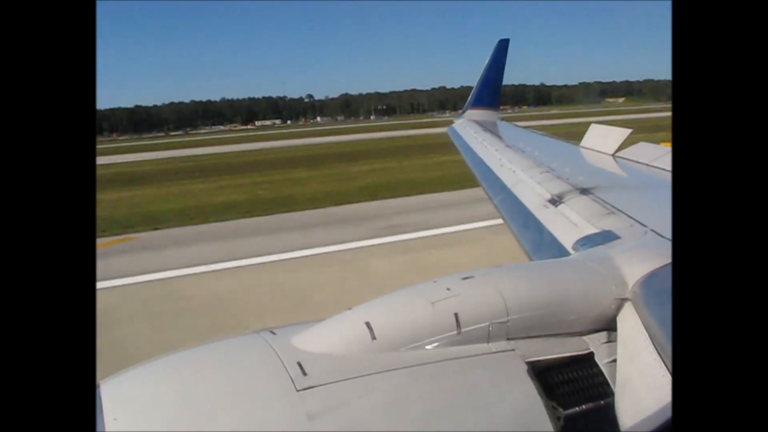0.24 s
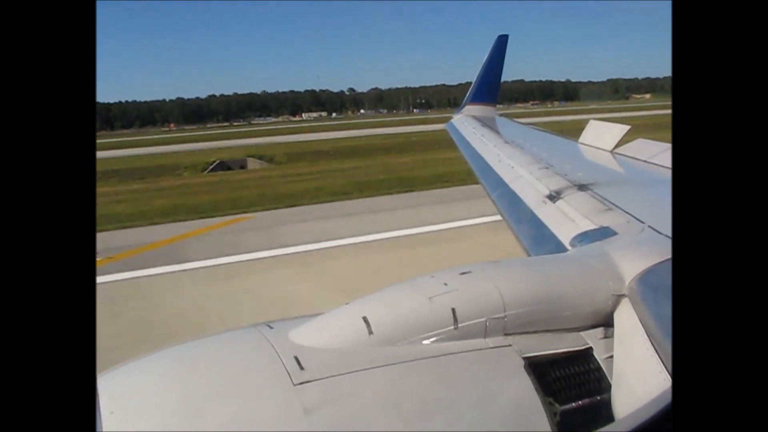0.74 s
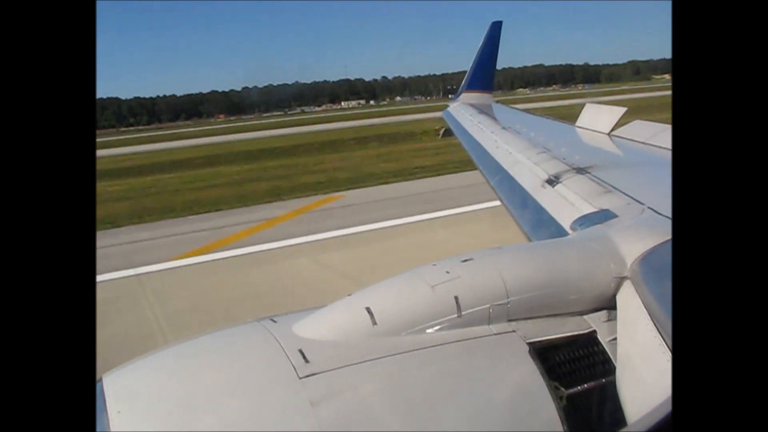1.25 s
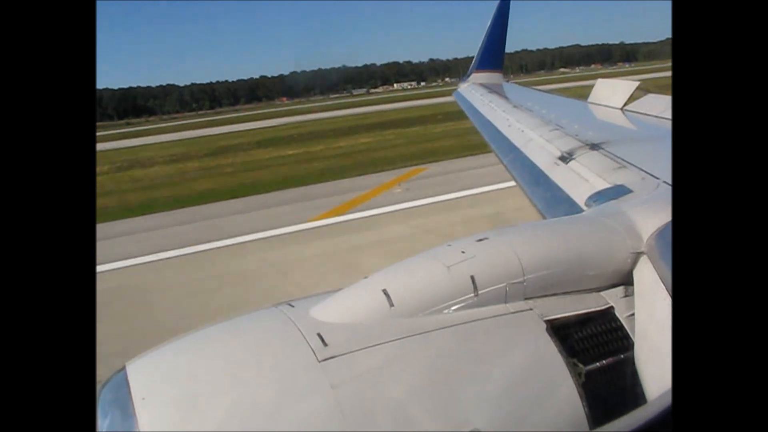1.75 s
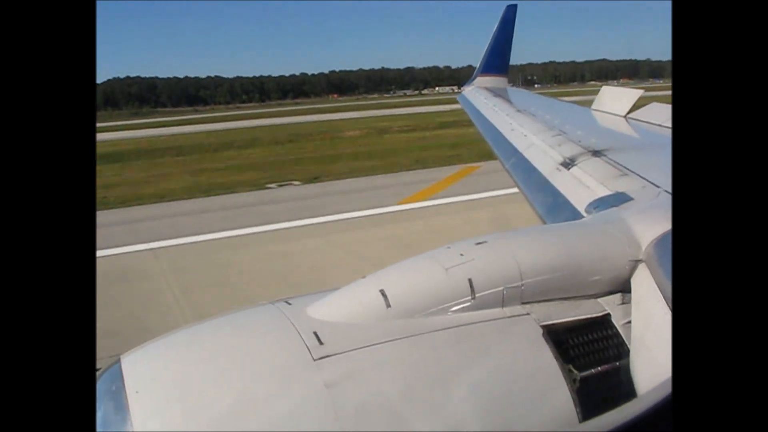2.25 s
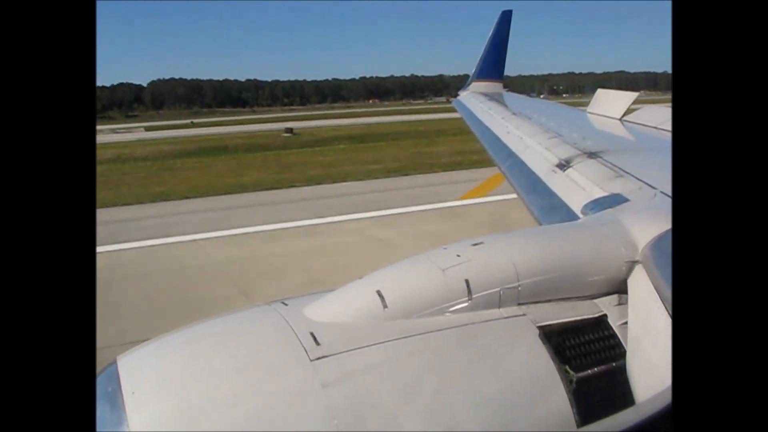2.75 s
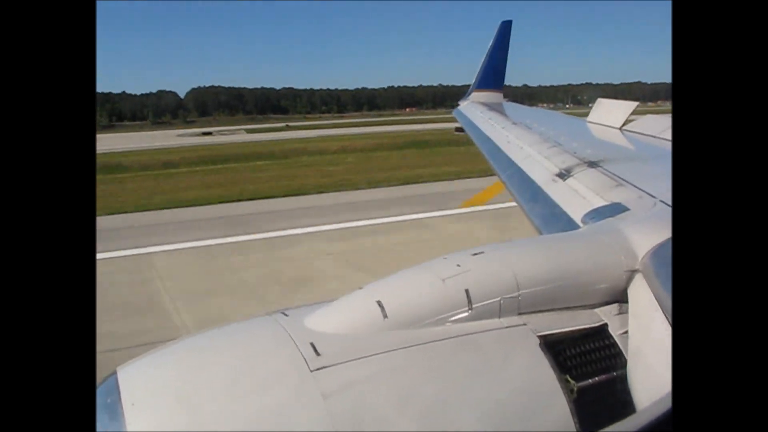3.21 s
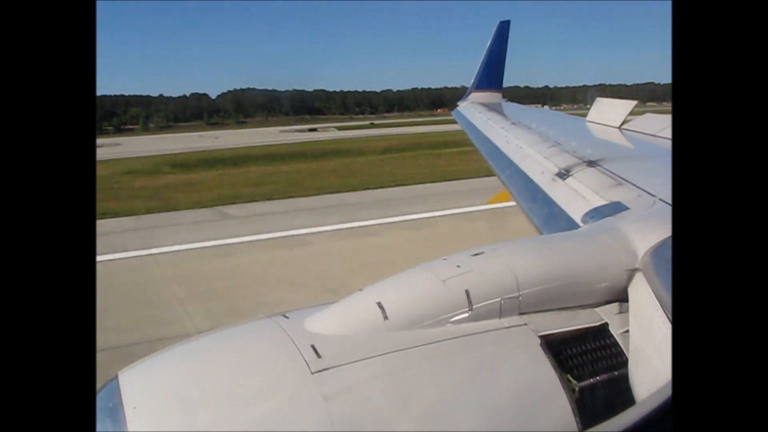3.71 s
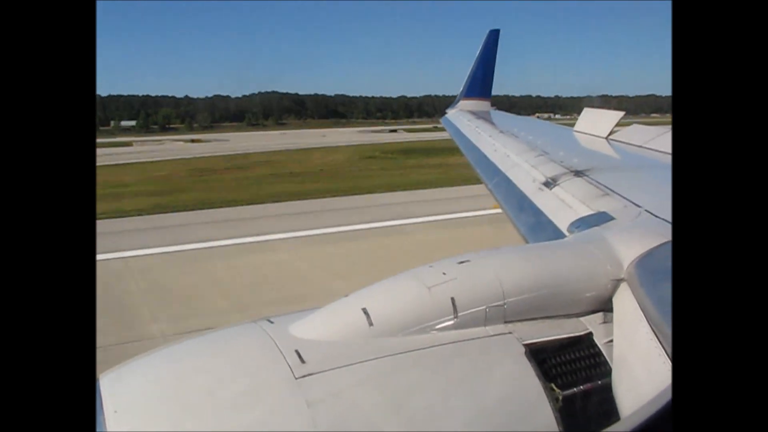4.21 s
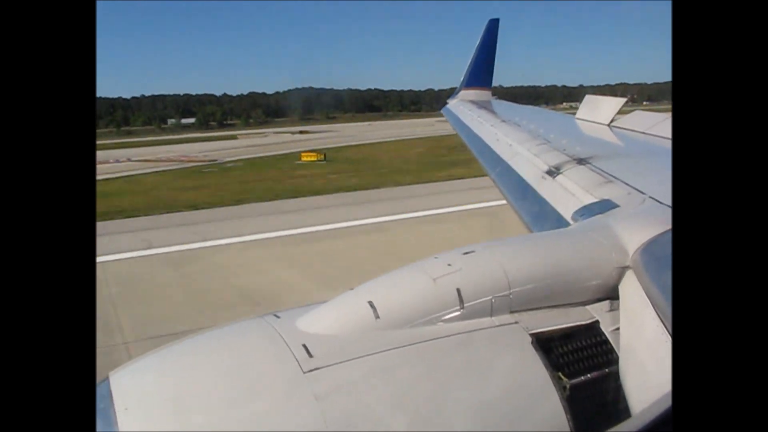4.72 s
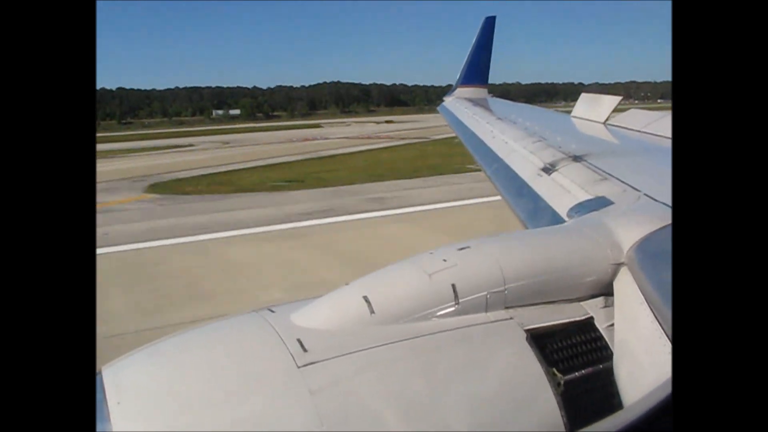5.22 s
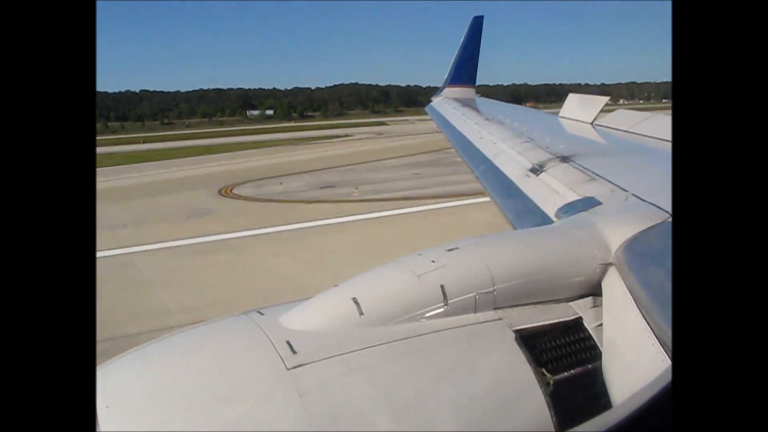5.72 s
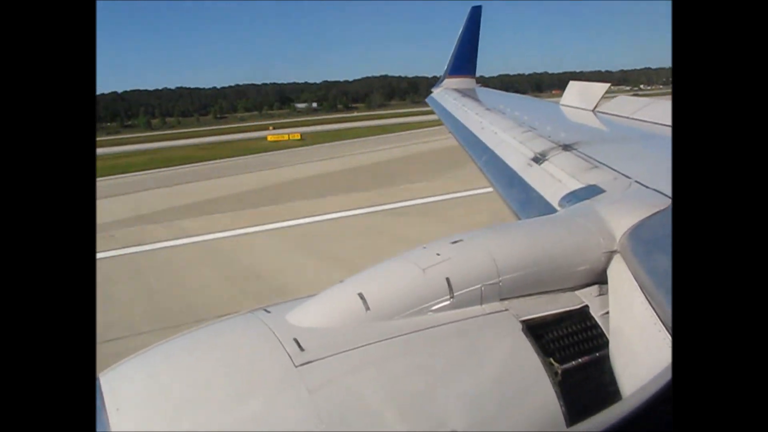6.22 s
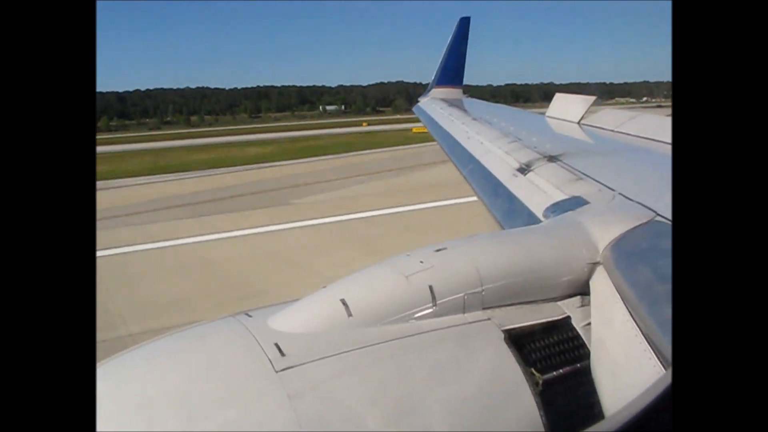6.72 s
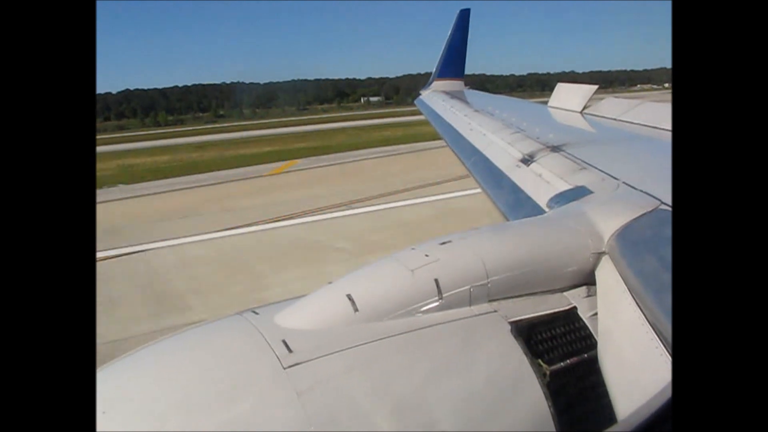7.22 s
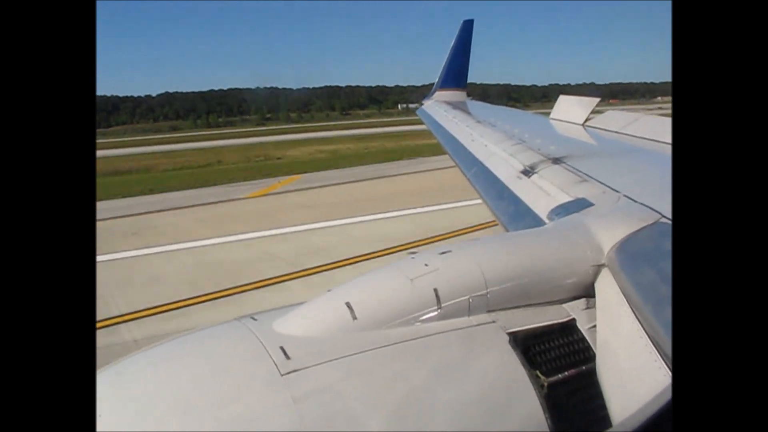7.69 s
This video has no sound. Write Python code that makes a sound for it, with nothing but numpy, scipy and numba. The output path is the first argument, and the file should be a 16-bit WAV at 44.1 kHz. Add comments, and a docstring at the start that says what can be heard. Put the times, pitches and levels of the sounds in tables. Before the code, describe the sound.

The sound opens inside an airliner cabin with a brief shudder and the deep rumble of wheels rolling on a runway, under a faint hiss of air vents. Loose plastic trim ticks lightly and irregularly, slightly to the left, through the first 3.5 seconds, with one more tick near 5 seconds. From about 1 second the jet engines spool up in reverse thrust, adding a low boom, a midrange drone and an airy hiss. The roar swells with short gusts between 2.4 and 3 seconds and is nearly at full strength just after 3 seconds. It then stays loud and dense, overloading the microphone so that the peaks sound rough and distorted. More brief buffets come around 3.5 to 4.3 seconds and 6 to 7.2 seconds. A thin, high fan hiss grows gradually as the roar continues to the end at about 8 seconds.

```python
"""An airliner cabin, at a window, as the aircraft brakes on the runway with both fans blowing forward. Wheels
rumble, and the reversed jet shakes the fuselage: this random forcing excites the air modes of the cabin, which
boom, and the wall panels, which ring and hiss. Vents and fans hiss, and sharp ticks sound now and then. The
boom overloads the microphone input, which squares off the peaks."""
import sys
import numpy as np
from scipy import signal
from scipy.fft import rfft, irfft
from scipy.io import wavfile
from scipy.ndimage import uniform_filter1d
from numba import njit

SR = 44100
rng = np.random.default_rng(int(sys.argv[2]) if len(sys.argv) > 2 else 0)


def generate_wav(sig):
    """Save sig (samples, or channels by samples) to the path in sys.argv[1] as 16-bit PCM at SR."""
    pcm = np.round(np.clip(np.atleast_2d(sig).T, -1, 1) * 32767).astype(np.int16)
    wavfile.write(sys.argv[1], SR, pcm)


N = 350595
TIME = np.arange(N) / SR


def undb(db):
    """Amplitude ratio of a level in decibels."""
    return 10 ** (np.asarray(db) / 20)

def unit(x):
    """Normalisation to rms 1."""
    return x / np.sqrt(np.mean(x ** 2))

def pan(db):
    """Level difference, left minus right, as a pair of gains."""
    return undb(np.array([[db], [-db]]) / 2)

@njit
def resonator(x, hz, width):
    """Second-order resonance: a state-variable band-pass with gain 1 at the centre."""
    y, band, low = np.empty(len(x)), 0., 0.
    g, damping = np.tan(np.pi * hz / SR), width / hz
    for i in range(len(x)):
        v = (band + g * (x[i] - low)) / (1 + g * (g + damping))
        band, low, y[i] = 2 * v - band, low + 2 * g * v, damping * v
    return y

def resonate(noise, hz, width):
    """Two resonators in cascade steepen the skirts of the band; rms 1."""
    hz, width = float(hz), float(width)
    return unit(resonator(resonator(noise, hz, width), hz, width))

def flicker(rate_hz):
    """Random modulation: values held for one period, then smoothed twice."""
    hold = int(SR / rate_hz)
    steps = np.repeat(rng.standard_normal(N // hold + 1), hold)
    return 0.56 * uniform_filter1d(uniform_filter1d(steps, hold), hold)[:N]

def mode(hz, width, side_db, pan_db):
    """Resonance forced by turbulence: two microphone ports share the mid and differ by the side."""
    mid, side = (resonate(rng.standard_normal(N), hz, 1.575 * width) for _ in range(2))
    return (mid + undb(side_db) * side * np.array([[1], [-1]])) * pan(pan_db)


# reverse thrust as the engines spool up: (time [s], share of full thrust [0-1])
THRUST = [(0, 0.03), (.8, 0), (1.5, 0.28), (2.1, 0.38), (2.6, 0.58), (3.1, 0.88), (3.7, 0.94), (4.7, 0.98),
          (5.5, 1), (6.3, 0.98), (7.2, 0.99), (7.95, 0.96)]
# gusts of the reversed jet on the fuselage: (time [s], level rise [dB], duration [s])
BUFFETS = [(2.365, 3, 0.044), (2.481, 5.5, 0.086), (2.71, 5.5, 0.078), (2.881, 6, 0.038),
           (3.553, 5.5, 0.075), (3.94, 4.5, 0.034), (4.24, 4, 0.072), (4.447, 0.5, 0.021),
           (4.857, 1, 0.033), (6.162, 5, .03), (6.546, 2, 0.036), (6.659, 5, 0.035), (7.166, 5.5, 0.045),
           (7.685, 1.5, 0.018)]

def forcing(idle_db, full_db, bend, shudder_db, buffet_share):
    """Forced response grows with the drive: a gain set by thrust, an opening shudder and gusts."""
    thrust = np.interp(TIME, *np.transpose(THRUST))
    thrust_db = idle_db + (full_db - idle_db) * thrust ** bend  # a bend under 1 rises early
    shudder = np.exp(-TIME / .25)
    buffet_db = sum(db * np.exp(-(2 * (TIME - at) / length) ** 2) for at, db, length in BUFFETS)
    return undb(thrust_db + shudder_db * shudder + buffet_share * buffet_db)


# overhead air vents: (frequency [Hz], bandwidth [Hz], level [dB])
VENT_MODES = [(7400, 700, -78), (8950, 900, -71.5), (11400, 900, -78.5)]

def vents():
    """Flow noise: the air outlets give a thin, wavering hiss."""
    return sum(undb(db + 1.5 * flicker(6)) * mode(hz, width, side_db=0, pan_db=-1)
               for hz, width, db in VENT_MODES)


def fans():
    """Narrow-band noise: the hiss of the fans grows steadily to the end of the roll."""
    end_db, rise_db_per_s = -56.5, 3
    level_db = end_db - rise_db_per_s * (N / SR - TIME)
    return undb(level_db) * mode(hz=4400, width=300, side_db=-2.5, pan_db=-6)


# airy top of the hiss: (frequency [Hz], relative spectral density [dB])
AIR_SPECTRUM = [(2500, -4.5), (4500, -9), (6000, -6.5), (7500, -7.5), (9000, -12), (10000, -12.5),
                (12000, -14), (14000, -18.5), (15800, -21)]

def air_hiss():
    """Incoherent broadband noise: the hiss is unrelated at the two ports."""
    hz, db = np.transpose(AIR_SPECTRUM)
    shape = undb(np.interp(np.log(np.fft.rfftfreq(N, 1 / SR) + 1), np.log(hz), db))
    hiss = unit(irfft(rfft(rng.standard_normal((2, N))) * shape, N)) * undb(0.62 * flicker(15))
    return hiss * forcing(idle_db=-58, full_db=-51, bend=1.5, shudder_db=11, buffet_share=1)


# sharp ticks: (time [s], level [dB], spectral tilt [dB/octave], left minus right [dB])
TICKS = [(0.1346, -34, -12, -2), (0.4218, -38, -4, -2), (0.6759, -40, -11, -3), (0.809, -35, -13, -8),
         (0.876, -40, -9, -3), (0.944, -40, -11, -7), (1.068, -43, -3, -6), (1.104, -40, 0, -2),
         (1.1917, -39, -11, -11), (1.372, -35, -12, -7), (1.4264, -42, -3, -10), (1.7286, -40, -2, -6),
         (1.9914, -36.5, -11, -10), (2.0265, -37, -4, 1), (2.0595, -31, -3, -5), (2.3131, -43, -4, -6),
         (2.4484, -42, 1.5, -3), (2.6474, -38.5, -3, -8), (2.7028, -37, -2, -5), (2.7574, -40, 0, -5),
         (2.801, -37, -3, -7), (2.9754, -38, -3, -7), (3.4714, -37.5, 1, -9), (5.1208, -39, -3, -5)]
# tick resonances: (frequency [Hz], bandwidth [Hz], relative level [dB], 60 dB decay time [s])
TICK_MODES = [(3120, 500, -4, 0.013), (3780, 350, 2, .02), (4800, 900, -0.5, 0.013),
              (7000, 2200, -5, 0.011), (9200, 1200, -2, .01), (11800, 3000, -10, .01),
              (14800, 2000, -14.5, .01)]

def ticking():
    """Damped free vibration: each tick is a burst of noise in broad, short-lived modes."""
    out, t = np.zeros((2, N)), np.arange(SR // 25) / SR
    attack = 1 - np.exp(-t / .0004)  # a soft attack rounds the onset
    for at, db, tilt, pan_db in TICKS:
        ring = np.zeros(len(t))
        for hz, width, mode_db, t60 in TICK_MODES:
            onset_db = db + mode_db + tilt * np.log2(hz / TICK_MODES[0][0])
            ring += undb(onset_db - 60 * t / t60) * resonate(rng.standard_normal(len(t)), hz, width)
        start = int(at * SR)
        out[:, start:start + len(t)] += pan(pan_db) * attack * ring
    return out


# wall and window panels, low droning modes and high hissing modes:
# (frequency [Hz], bandwidth [Hz], relative level [dB], side minus mid [dB], left minus right [dB])
DRONE_MODES = [(741.3, 76, 0, -14, 1), (1003, 192, -5.5, -18.5, 0.9), (1390, 120, -13.5, -7.5, 0.018)]
HISS_MODES = [(1640, 140, 0.5, -7, -1.5), (1965, 150, -4, -5, -3.5), (2153, 70, -4.5, -4, -3),
              (2408, 100, -11, -7, -10), (2680, 69, -9, -6, 5), (2807, 28, -7, -8.5, 4.5),
              (3180, 920, 2, -7, -6.5), (3770, 360, -0.5, -6, -5), (4284, 90, -10.5, -4, -10.5),
              (4660, 1030, -6, 3.5, -5)]

def panels(modes):
    """Forced vibration of plates: eddies give the modes a shared throb and each its own flicker."""
    throb_db = 0.53 * flicker(14) + 0.51 * flicker(60)
    return sum(undb(db + throb_db + flicker(9)) * mode(hz, width, side_db, pan_db)
               for hz, width, db, side_db, pan_db in modes)

def walls():
    """Radiation from panels: their drone and hiss swell with the thrust."""
    drone_gain = forcing(idle_db=-42.5, full_db=-32, bend=0.85, shudder_db=2, buffet_share=0.53)
    hiss_gain = forcing(idle_db=-58, full_db=-48, bend=0.75, shudder_db=5.5, buffet_share=0.18)
    return drone_gain * panels(DRONE_MODES) + hiss_gain * panels(HISS_MODES)


def cabin_air(modes, side_db, pan_db, flicker_db):
    """Standing waves in an enclosure: long wavelengths reach both ports nearly alike."""
    return unit(sum(undb(db + flicker_db * flicker(5)) * mode(hz, width, side_db, pan_db)
                    for hz, width, db in modes))


# cabin air modes driven by the wheels: (frequency [Hz], bandwidth [Hz], relative level [dB])
WHEEL_MODES = [(28, 67, -7.5), (53.1, 25, -0.5), (67.4, 34, -10.5)]

def wheels():
    """Structure-borne sound: the rolling wheels rumble in the lowest air modes."""
    gain = forcing(idle_db=-17.5, full_db=-18, bend=2, shudder_db=5, buffet_share=0.1)
    return gain * cabin_air(WHEEL_MODES, side_db=-29.5, pan_db=0.9, flicker_db=1.5)


# cabin air modes driven by the jet: (frequency [Hz], bandwidth [Hz], relative level [dB])
DEEP_MODES = [(92.7, 23.6, -1.5), (125.3, 45, -3.5), (170.4, 35.4, 1), (211.3, 32.7, -3.5)]
HIGH_MODES = [(278.6, 30.4, -0.5), (314.9, 35.1, -1.5), (406, 53, -11.5), (479.4, 72, -16)]

def jet_boom():
    """Structural-acoustic coupling: the reversed jet shakes the fuselage and the enclosed air booms."""
    deep = cabin_air(DEEP_MODES, side_db=-31, pan_db=0.67, flicker_db=1.25)
    deep *= forcing(idle_db=-18, full_db=-10.5, bend=1.2, shudder_db=0.5, buffet_share=0.82)
    high = cabin_air(HIGH_MODES, side_db=-29, pan_db=0.57, flicker_db=1.57)
    high *= forcing(idle_db=-26, full_db=-15, bend=0.85, shudder_db=-0.6, buffet_share=0.85)
    return deep + high


def scene():
    """Superposition: the pressures of all sources add at the two ports."""
    return wheels() + jet_boom() + walls() + air_hiss() + vents() + ticking() + fans()


def record(dry):
    """Saturation: the input clips at its rail; later stages add hiss and limit the bandwidth."""
    lag_s, start_db, sag_end_db, sag_slope = .5, -18, -11, .7
    pole = np.exp(-1 / (lag_s * SR))
    power, _ = signal.lfilter([1 - pole], [1, -pole], np.mean(dry ** 2, axis=0), zi=[undb(2 * start_db)])
    # the rail sinks to its floor as the slow mean power of the roar loads the input
    rail_floor, knee = .5, 28
    rail = rail_floor * undb(sag_slope * np.maximum(sag_end_db - 10 * np.log10(power), 0))
    clipped = dry / (1 + np.abs(dry / rail) ** knee) ** (1 / knee)
    hiss = np.array([unit(resonator(noise, hz=5000., width=4000.))
                     for noise in rng.standard_normal((2, N))])
    coupling = signal.butter(1, 14, "high", fs=SR, output="sos")  # tilts the flat tops
    treble_cut = signal.ellip(10, .2, 80, 15750, fs=SR, output="sos")
    return signal.sosfilt(treble_cut, signal.sosfilt(coupling, clipped + undb(-66) * hiss))


dry = scene()
out = record(dry)
generate_wav(out)
```